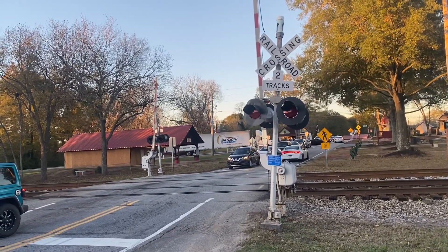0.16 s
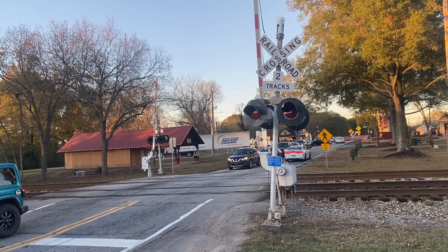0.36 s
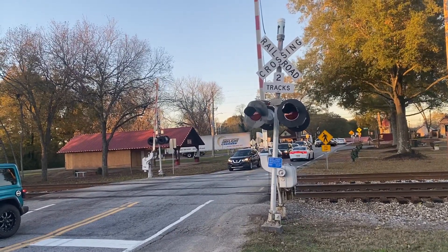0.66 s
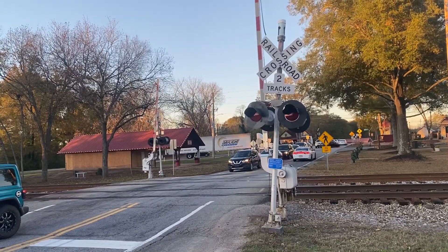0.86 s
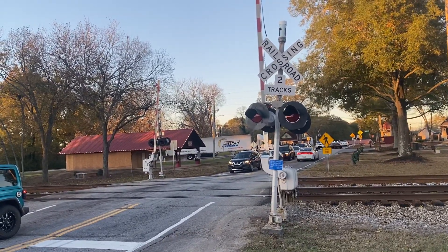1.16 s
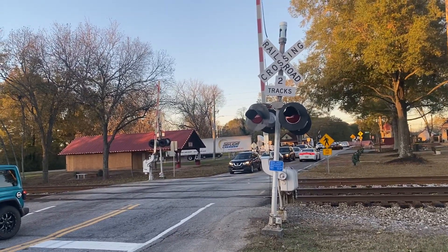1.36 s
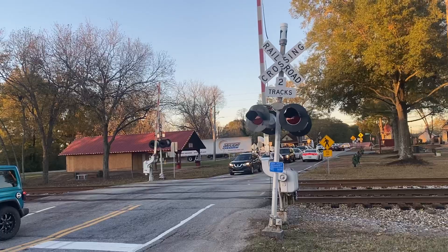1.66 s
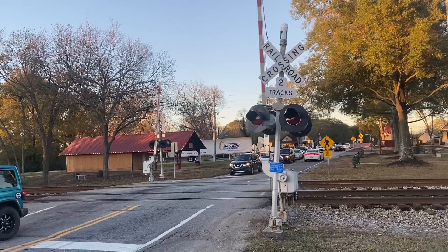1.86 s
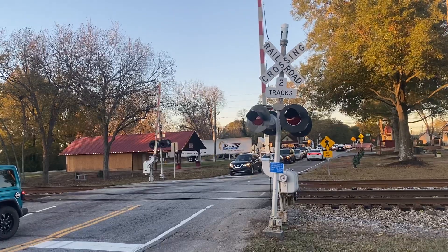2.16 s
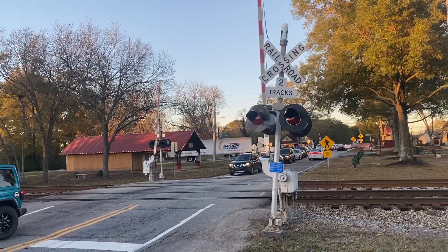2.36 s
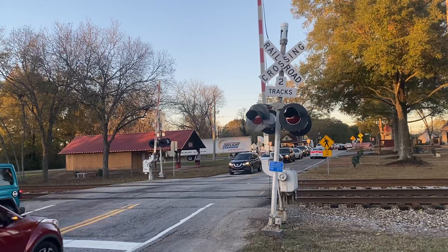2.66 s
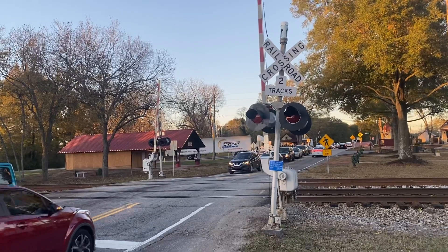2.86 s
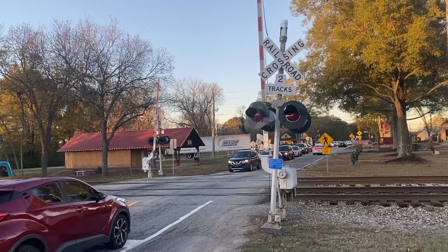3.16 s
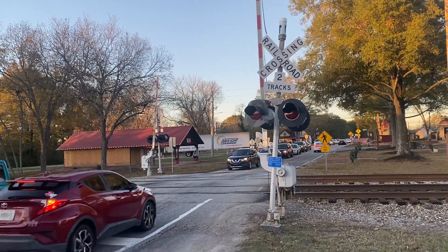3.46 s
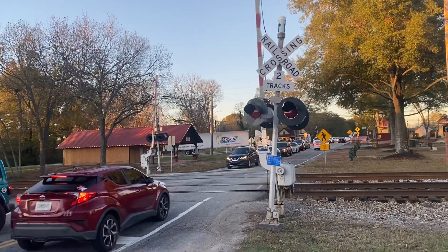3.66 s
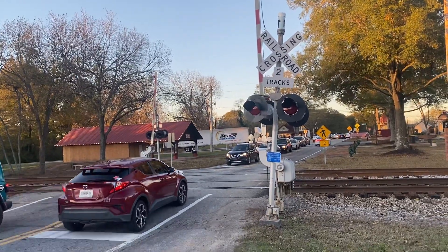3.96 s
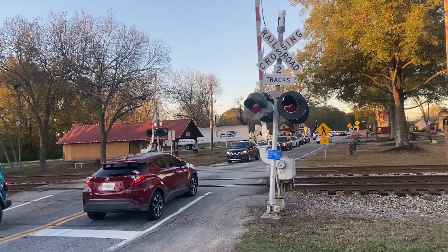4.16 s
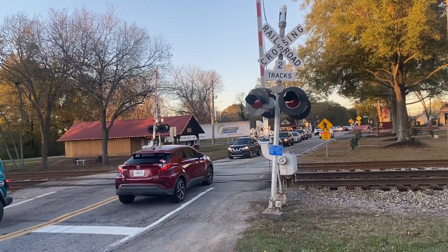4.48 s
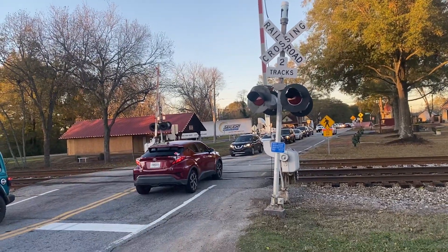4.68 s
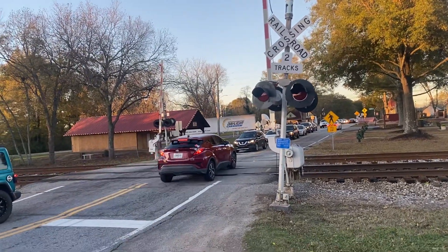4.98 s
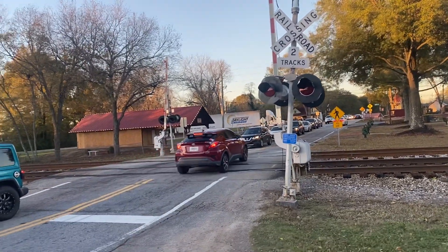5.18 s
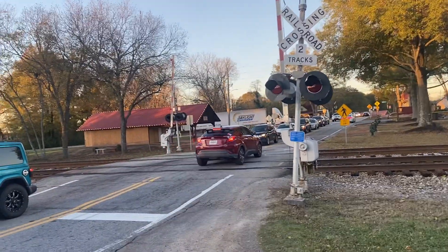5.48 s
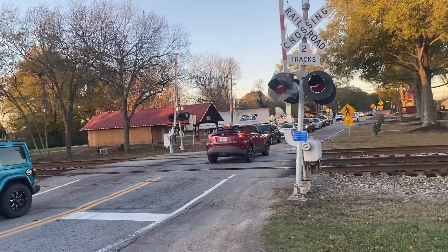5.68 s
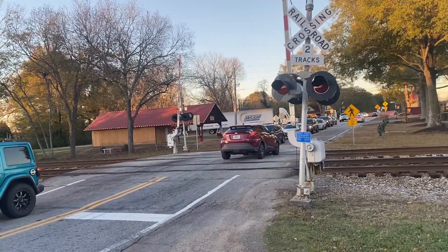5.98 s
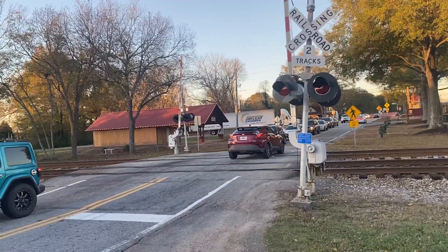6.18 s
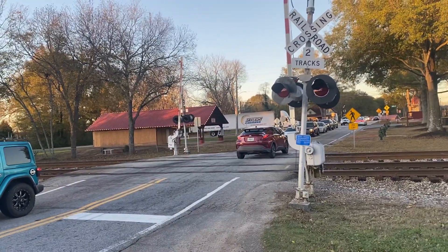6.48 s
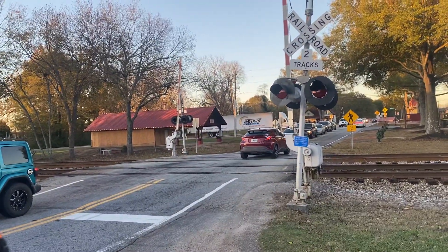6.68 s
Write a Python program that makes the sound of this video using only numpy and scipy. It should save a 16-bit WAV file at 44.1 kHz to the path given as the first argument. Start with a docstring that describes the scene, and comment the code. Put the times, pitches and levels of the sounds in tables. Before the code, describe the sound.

Cars pull away over a railway level crossing, engines revving and easing off, wheels thumping over rails, a faint distant train horn near the end.

```python
"""At a level crossing, cars pull away: two engines rev up and ease off, a third drones lower, one idles, one
draws near. Engines are sums of firing orders coloured by an exhaust pipe; the roar and hiss of tyres on
asphalt are shaped noise in plain swells. Wheels thump over the rails as short low rings, crossing panels
clack as struck modes, and far away a train horn sounds a chord of wavering harmonics.
All of it is heard through two microphone ports that differ in phase and level."""
import sys
import numpy as np
from scipy import signal
from scipy.io import wavfile
from scipy.ndimage import uniform_filter1d

SR = 44100
rng = np.random.default_rng(int(sys.argv[2]) if len(sys.argv) > 2 else 0)


def dump_mix(stems):
    """Bounce the given channels to the path in sys.argv[1] as a 16-bit WAV at rate SR."""
    frames = np.atleast_2d(stems).T  # one column per channel
    limited = np.clip(frames, -1, 1)  # hard clip at full scale
    pcm = np.round(limited * 32767).astype(np.int16)
    wavfile.write(sys.argv[1], SR, pcm)


N = 301291

# the two ports as they hear the road: pitch_hz, likeness (0-1), right_lead_rad, left_minus_right_db
ROAD_PORTS = [(60, .92, .22, -.3), (260, .78, .35, .4), (430, .05, -1, 1.2), (600, .62, -2.8, 1.3),
              (870, .74, -3, -.1), (1350, .74, -3.25, -3.7), (1650, .5, -3.8, -2.5),
              (2100, .25, -5.7, -1.9), (2600, .4, -6.3, -1.7), (3400, .42, -8.1, -1.4),
              (4300, .28, -11.5, -.7), (5200, .2, -14, .8), (6000, .3, -17.7, -1.6), (7000, .3, -18.8, -1),
              (9000, .1, -20.4, 0)]
# exhaust colour of the second and the arriving car: pitch_hz, gain_db
SECOND_PIPE = [(80, -0.5), (200, 0), (225, -3), (250, -2.5), (290, -6), (328, -3.5), (340, -20), (400, -25)]
# firing orders of the droning and the idling car: multiple of the firing rate, gain_db
DRONE_ORDERS = [(1, 0.016), (2, 0.0027)]
# exhaust colour of the droning and the idling car: pitch_hz, gain_db
DRONE_PIPE = [(70, 1.3), (172, 0.05)]


def gain_of(db):
    """Decibels to amplitude."""
    return 10 ** (np.asarray(db) / 20)


def evened(x):
    """Scales to rms 1."""
    return x / np.sqrt(np.mean(np.abs(x) ** 2) + 1e-20)


def read(points, hz, order=1):
    """Reads one column of a table at the given pitches, on a log-frequency axis."""
    table = np.transpose(points)
    return np.interp(np.log(hz + 1), np.log(table[0] + 1), table[order])


def wander(count, seconds):
    """Slow random drift of rms 1: white noise averaged twice over this many seconds."""
    size = max(int(seconds * SR), 2)
    noise = rng.standard_normal(count + 2 * size)
    smooth = uniform_filter1d(uniform_filter1d(noise, size), size)
    return evened(smooth[size:-size])


def partial(turns, hz, level_db, ports):
    """One sine as the two ports pick it up; the right one is shifted in phase and level."""
    lead_rad, tilt_db = read(ports, hz, order=2), read(ports, hz, order=3)
    side = np.array([[0.], [1.]])  # left, right
    amplitude = np.sqrt(2) * gain_of(level_db - side * tilt_db)  # level_db is an rms level
    return amplitude * np.sin(2 * np.pi * turns + side * lead_rad)


def engine(rows, orders, pipe, jitter, flutter_db, lift_s=np.inf):
    """Firing orders as tones coloured by the pipe; uneven combustion shakes their pitch and level."""
    lift_takes_s, lift_db = .06, -24  # off the throttle, orders above the first drop this fast and this far
    s, hz, *levels_db = np.transpose(rows)
    start = round(s[0] * SR)
    t = np.arange(start, min(round(s[-1] * SR), N)) / SR
    firing_hz = np.interp(t, s, hz) * (1 + jitter * wander(len(t), 0.05))
    turns = np.cumsum(firing_hz) / SR
    lifted = np.clip((t - lift_s) / lift_takes_s, 0, 1)
    tones = np.zeros((2, len(t)))
    for k, db in orders:
        column = min(int(k), len(levels_db)) - 1  # the last level column serves all higher orders
        order_db = db + np.interp(t, s, levels_db[column]) + read(pipe, k * firing_hz)
        order_db += lift_db * lifted * (k > 1)
        order_db += flutter_db * wander(len(t), 0.056)
        tones += partial(k * turns + rng.random(), k * firing_hz, order_db, ROAD_PORTS)
    out = np.zeros((2, N))
    out[:, start:start + len(t)] = tones * signal.windows.tukey(len(t), .02)  # short fade at each end
    return out


def first_car():
    """An engine revs up through strong low orders, then its pitch sinks once the throttle is released."""
    # start_s, firing_hz, then before order and pipe gains: order_1_db, order_2_db, higher_orders_db
    revs = [(0.0, 65.5, -30, -25, -44), (0.15, 70.1, -28, -27, -38), (0.28, 73.6, -27, -25, -36),
            (0.42, 76, -26, -25, -35), (0.54, 78.6, -25, -35, -37), (0.63, 80.3, -30, -26, -36),
            (0.69, 81.5, -28, -42, -46), (0.76, 83, -28, -28, -33), (0.83, 84.3, -27, -31, -32),
            (0.9, 85.8, -27, -34, -50), (0.97, 87.3, -25, -28, -31), (1.07, 89.3, -25, -29, -32),
            (1.13, 90.8, -26, -35, -43), (1.22, 93.3, -25, -23, -35), (1.3, 95.5, -24, -25, -36),
            (1.42, 98.5, -24, -25, -46), (1.48, 100, -23, -24, -38), (1.56, 102, -24, -23, -44),
            (1.64, 103, -25, -21, -39), (1.79, 105.4, -27, -22, -39), (1.83, 106.3, -32, -42, -44),
            (1.87, 107.8, -32, -42, -44), (1.92, 110.2, -27, -24, -40), (2.05, 116, -21, -27, -44),
            (2.2, 121, -19, -25, -44), (2.3, 122.3, -23, -25, -44), (2.36, 122, -38, -28, -44),
            (2.45, 119.5, -23, -28, -44), (2.7, 113.5, -24, -28, -44), (3.0, 100.9, -22, -28, -44)]
    # multiple of the firing rate, gain_db
    orders = [(1, 0), (2, 0), (2.5, -18), (3, -1), (4, -9)]
    # exhaust colour: pitch_hz, gain_db
    pipe = [(65, 0), (250, 0), (266, 5), (294, 5), (305, 0), (330, 0), (350, -18)]
    return engine(revs, orders, pipe, jitter=.002, flutter_db=1.4, lift_s=2.37)


def second_car():
    """A later engine dips, climbs and eases off; its upper orders collapse as the driver lifts."""
    # start_s, firing_hz, then before order and pipe gains: lowest_order_db, upper_orders_db
    revs = [(2.95, 92.8, -46, -41), (3.06, 92.8, -22.5, -26), (3.2, 91.06, -27.5, -22.5),
            (3.29, 88.3, -24, -23), (3.38, 83.34, -16.5, -19), (3.5, 89.93, -25, -23.5),
            (3.75, 93.53, -27, -22.5), (4.05, 100, -20, -23), (4.3, 105.9, -23.5, -26),
            (4.55, 110.9, -24.5, -27), (5.0, 117.8, -23.5, -26.5), (5.3, 123.2, -29.5, -27.5),
            (5.55, 126.4, -26.5, -27.5), (5.95, 119, -30.5, -31.5), (6.7, 81.1, -32, -29)]
    # multiple of the firing rate, gain_db
    orders = [(1, 1), (2, -0.5), (2.5, -16), (3, -8), (4, -24.5)]
    return engine(revs, orders, SECOND_PIPE, jitter=.003, flutter_db=1.1, lift_s=5.58)


def droning_car():
    """Two firing orders of a steady engine sag slowly in pitch."""
    # start_s, firing_hz, then before order and pipe gains: lowest_order_db, second_order_db
    revs = [(0.0, 84.9, -32.5, -34.5), (0.35, 85.3, -33, -43), (1.4, 84.64, -29, -33),
            (2.3, 85.85, -31, -33.5), (2.5, 86.03, -36.5, -32.5), (3.1, 84.86, -25, -41),
            (3.4, 83.87, -24, -30), (3.7, 82.16, -21.5, -31), (4.2, 80.68, -21, -25.5),
            (4.4, 80.55, -15.5, -25), (4.5, 79.4, -16.5, -47), (4.72, 78.5, -15, -28.5),
            (4.78, 78.7, -21.5, -36), (4.88, 78.6, -16.5, -39.5), (5.15, 78.53, -17, -33),
            (5.22, 78.2, -26, -34), (5.31, 76.44, -15, -39), (5.44, 75.7, -28.5, -36),
            (5.6, 75.3, -26.5, -42), (5.95, 73.9, -13, -31), (6.3, 71.46, -26, -28.5),
            (6.55, 71.92, -19, -29.5), (6.83, 70.87, -27, -37)]
    return engine(revs, DRONE_ORDERS, DRONE_PIPE, jitter=0.0034, flutter_db=1.5)


def idling_car():
    """The lowest order alone, at an almost constant rate, with uneven firing."""
    # start_s, firing_hz, level_db before order and pipe gains
    revs = [(0.0, 72.78, -30), (3.0, 72.72, -28.5)]
    return engine(revs, DRONE_ORDERS[:1], DRONE_PIPE, jitter=0.014, flutter_db=5.0)


def arriving_car():
    """Upper firing orders of a car drawing near rise in pitch at the end."""
    # start_s, firing_hz, level_db before order and pipe gains
    revs = [(6.3, 47.35, -32), (6.5, 50.86, -37), (6.7, 54.8, -28.5), (6.83, 55, -32)]
    # multiple of the firing rate, gain_db
    orders = [(2.5, -0.5), (3, -1.3)]
    return engine(revs, orders, SECOND_PIPE, jitter=0.0041, flutter_db=0.5)


def rails():
    """Each wheel drop is a short low ring of tyre and body; loose panels add a clack that rattles on briefly."""
    # wheels over the rails: start_s, envelope_peak_db, pitch_hz
    thumps = [(0.596, -16.5, 155), (0.896, -11.5, 90), (0.969, -9, 88), (1.14, -14, 90.44),
              (1.958, -13, 109), (2.643, -8.5, 95.4), (2.745, -10, 102), (5.041, -10.5, 90.96),
              (5.279, -18, 93.8), (5.363, -10, 101.5), (5.463, -13.5, 121), (5.779, -10.5, 137),
              (5.996, -12, 126), (6.267, -11.5, 111.4), (6.331, -14, 136.4)]
    # panels knocked by a tyre: start_s, then added to the mode gains: low_db, middle_db, high_db
    clacks = [(4.634, -24, -30, -28), (4.647, -23, -24, -24), (4.688, -21, -29, -30),
              (4.856, -23, -25, -28), (5.025, -23, -30, -28), (5.041, -26, -28, -19),
              (5.255, -28, -26, -32), (5.279, -23, -18, -14), (5.316, -20, -26, -30),
              (5.352, -27, -24, -32), (5.382, -24, -24, -32), (5.697, -28, -22, -32)]
    # panel modes: pitch_hz, width_hz, gain_db
    panel = [(230, 60, 1), (340, 90, -4), (660, 110, -1), (950, 180, -1), (1450, 280, -3), (1950, 350, 0),
             (2600, 600, -4), (3200, 800, -14)]
    # the ports as they hear the crossing ahead: pitch_hz, likeness (0-1), right_lead_rad, left_minus_right_db
    panel_ports = [(200, 1, .3, -1), (3000, 1, .8, -4)]
    length = 8000  # samples given to each knock
    out, t = np.zeros((2, N + length)), np.arange(length) / SR
    for s, db, hz in thumps:
        start = round(s * SR)
        shape = (1 - np.exp(-t / 0.0048)) * np.exp(-t / 0.011)
        thump = gain_of(db) * shape / shape.max() * np.sin(2 * np.pi * hz * t)
        out[:, start:start + length] += thump
    for s, *blow_db in clacks:
        start = round(s * SR)
        rattle = gain_of(-25) * rng.standard_normal(length) * np.exp(-t / .016)
        rattle[0] = 1  # the blow itself
        ring = np.zeros((2, length))
        for hz, width_hz, mode_db in panel:
            band = (hz > 500) + (hz > 1200)  # 0 low, 1 middle, 2 high
            tone = partial(hz * t, hz, mode_db + blow_db[band], panel_ports)
            ring += tone * np.exp(-np.pi * width_hz * t)
        ring *= (1 - np.exp(-t / .0011)) ** 2  # rubber softens the blow
        out[:, start:start + length] += signal.fftconvolve(ring, rattle[None], axes=1)[:, :length]
    return out[:, :N]


def shaped_noise(spectrum, level_db, patchy_db, flicker_db, size):
    """Random short-time spectra in drifting patches, split between the ports, under a level curve."""
    hop = size // 4
    frames, hz = N // hop + 5, np.fft.rfftfreq(size, 1 / SR)
    a, b, c, d, patches = rng.standard_normal((frames, len(hz), 5)).T
    patches = uniform_filter1d(patches, size=12, axis=0)  # smooth over pitch
    patches = evened(uniform_filter1d(patches, size=12, axis=1))  # smooth over time
    flicker = evened(uniform_filter1d(rng.standard_normal(frames), size=3))
    # the right port shares part of the left one's noise, shifted in phase
    likeness = np.clip(read(ROAD_PORTS, hz), 0, 1)[:, None]
    lead = np.exp(1j * read(ROAD_PORTS, hz, order=2))[:, None]
    left = a + 1j * b
    right = likeness * lead * left + np.sqrt(1 - likeness ** 2) * (c + 1j * d)
    tilt = gain_of(read(ROAD_PORTS, hz, order=3) / 2)[:, None]
    colour_db = read(spectrum, hz)[:, None] + patchy_db * patches + flicker_db * flicker
    spectra = np.array([left * tilt, right / tilt]) * gain_of(colour_db)
    noise = signal.istft(spectra, nperseg=size, noverlap=size - hop)[1][:, :N]
    return evened(noise) * gain_of(level_db)


def swell_db(order):
    """How far the bell-shaped swells of road noise lift one of its bands."""
    # fullest_s, spread_s, then rises: bass_db, tyre_roar_db, tread_hiss_db, grit_db, fizz_db, faint_hiss_db
    swells = [(.7, 0.5, 2.5, -1, 3.5, 0, 1.5, 1.5), (1.6, 0.5, 5, 1, 0.5, 1.5, 2, 3.5),
              (2.2, 0.34, 1, 1, 0.5, 5, 2.5, 6), (3.05, 0.56, 3.5, 2, 1.5, 7.5, 3.5, 4),
              (3.899, 0.51, 0.5, 3.5, 0, -1, 2, 2.5), (5.02, 0.17, 0, 0, 1, 2, 2.5, 3),
              (5.15, 0.46, 2.5, 2, 0.5, 5.5, 2, 0.5), (5.7, 0.18, 2.5, 1, 2, 2, 1.5, 2.5),
              (6.9, 0.95, 3, 4, 4, 5.5, 4, 7.5)]
    t = np.arange(N) / SR
    return sum(row[order] * np.exp(-((t - row[0]) / row[1]) ** 2) for row in swells)


def road_noise():
    """Six bands of road noise from rumble to fizz, and a very faint hiss above 9 kHz, all in swells."""
    # noise colours, all with the columns pitch_hz, relative_db (per Hz)
    rumble = [(20, -34), (28, -21.5), (40, -6), (55, 14), (75, 1.5), (110, 2), (160, -2), (250, -11),
              (330, -18.5), (500, -81.5)]
    boom = [(200, 2.5), (300, 7), (400, 8), (520, 4), (620, 7.5), (900, -56.5)]
    roar = [(400, -23.5), (560, -8), (720, 6), (820, 3), (1000, 0), (1200, -6), (1500, -12.5),
            (2000, -62.5)]
    hiss = [(900, -35), (1200, -1.5), (1450, -1), (2000, -6.5), (2500, -10.5), (3000, -17), (3800, -34.5),
            (5000, -65)]
    grit = [(2000, -27), (2600, 2), (3100, 5.5), (3600, 4.5), (4300, -37.5)]
    fizz = [(3400, -9.5), (4000, 1), (4900, -1), (5700, -5.5), (6400, -6), (8000, -12.5), (8600, -45)]
    faint_hiss = [(9300, -35.5), (10000, -1.5), (12200, -1), (13000, -20), (14500, -5.5), (15700, -8)]
    bass_db = swell_db(order=2)
    road = shaped_noise(rumble, -25.0 + bass_db, patchy_db=0.5, flicker_db=1.24, size=2048)
    road += shaped_noise(boom, -38.0 + 0.7 * bass_db, patchy_db=1.5, flicker_db=0.1, size=1024)
    road += shaped_noise(roar, -35.5 + swell_db(order=3), patchy_db=1.0, flicker_db=1.0, size=1024)
    road += shaped_noise(hiss, -42 + swell_db(order=4), patchy_db=1.3, flicker_db=0.1, size=512)
    road += shaped_noise(grit, -58.5 + swell_db(order=5), patchy_db=2.0, flicker_db=0.5, size=512)
    road += shaped_noise(fizz, -56.5 + swell_db(order=6), patchy_db=1.34, flicker_db=0.24, size=512)
    road += shaped_noise(faint_hiss, -70.5 + swell_db(order=7), patchy_db=3.0, flicker_db=0.3, size=512)
    return road


def train_horn():
    """Five bells of a chord; the long path through the air makes every harmonic waver on its own."""
    # bells: pitch_hz, list of (harmonic number, relative_db)
    bells = [(308.7, [(1, -47), (2, -53)]), (362.1, [(1, -43.5), (2, -43.5), (3, -51), (4, -55), (5, -57)]),
             (469.2, [(1, -42), (2, -53)]), (506.5, [(1, -46.5)]), (516, [(1, -49)])]
    # each bell carries best at its own moment: best_s, fall away from it (dB per s squared)
    carry = [(5.6, -3), (6.5, -2), (5.6, -4), (6.15, -4), (5.8, -.5)]
    # the ports as they hear the horn, off to the right:
    # pitch_hz, likeness (0-1), right_lead_rad, left_minus_right_db
    horn_ports = [(300, 1, .7, -2), (470, 1, 1.3, -1), (720, 1, 1.9, -3), (1000, 1, 3, -2),
                  (1450, 1, 2.8, -6), (1810, 1, .7, -5)]
    horn_s, rise_s = 4.8, .1
    start = round(horn_s * SR)
    t, out = np.arange(start, N) / SR, np.zeros((2, N))
    for (hz, harmonics), (best_s, fall_db) in zip(bells, carry):
        for k, db in harmonics:
            phase = .06 * np.sqrt(k) * wander(len(t), .07) + rng.random()  # in turns
            level_db = db + 1.5 + fall_db * (t - best_s) ** 2
            level_db += 2.0 * wander(len(t), .1)
            level_db -= 7 * np.maximum(wander(len(t), .045) - .8, 0)  # gusts break the tone up
            out[:, start:] += partial(k * hz * t + phase, k * hz, level_db, horn_ports)
    out[:, start:] *= np.minimum((t - horn_s) / rise_s, 1) ** 2
    return out


def scene():
    """Engines and road noise under a slightly wavering left-right balance, with rails and horn added."""
    # left-right balance wavers slightly: start_s, left_minus_right_db
    balance = [(0, 0.4), (3.899, 0.44), (5.301, -0.7), (6.83, 1)]
    cars = first_car() + second_car() + droning_car() + idling_car() + arriving_car()
    balance_db = np.interp(np.arange(N) / SR, *np.transpose(balance))
    side_db = balance_db * np.array([[.5], [-.5]])
    return (cars + road_noise()) * gain_of(side_db) + rails() + train_horn()


def record(dry):
    """The small microphones lose the deepest bass; then the band limit of the recorder."""
    edge_hz = 15750
    bass_cut = signal.butter(2, 36., "high", fs=SR, output="sos")
    thin = signal.sosfiltfilt(bass_cut, dry)
    taps = signal.firwin(511, edge_hz, window=("kaiser", 9), fs=SR)
    half = len(taps) // 2
    padded = np.pad(thin, ((0, 0), (half, half)), "reflect")
    return signal.oaconvolve(padded, taps[None], "valid")


dry = scene()
out = record(dry)
dump_mix(out)
```